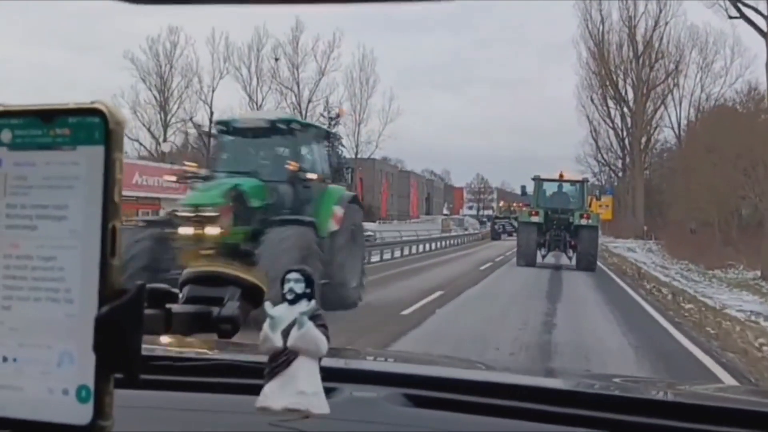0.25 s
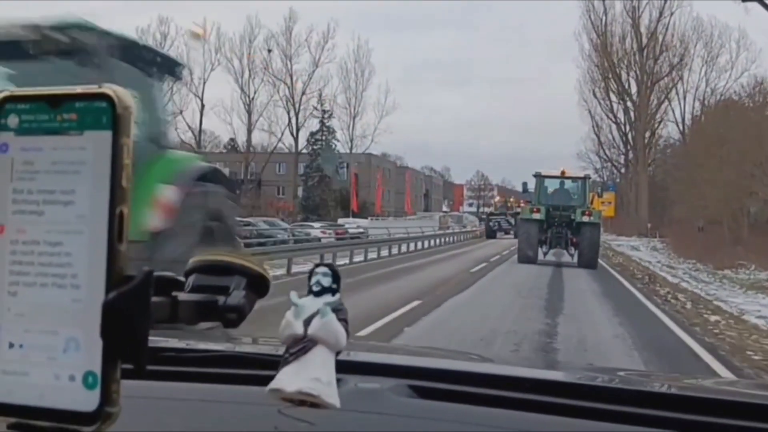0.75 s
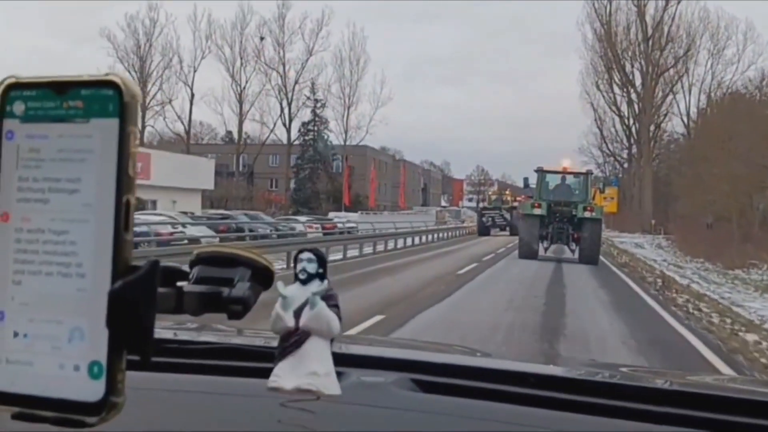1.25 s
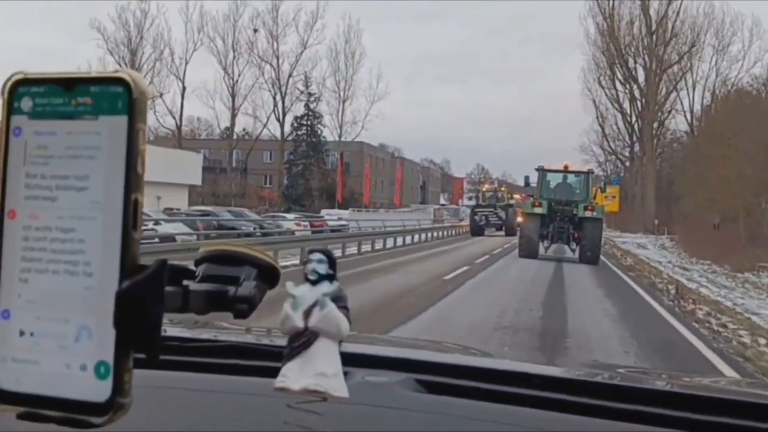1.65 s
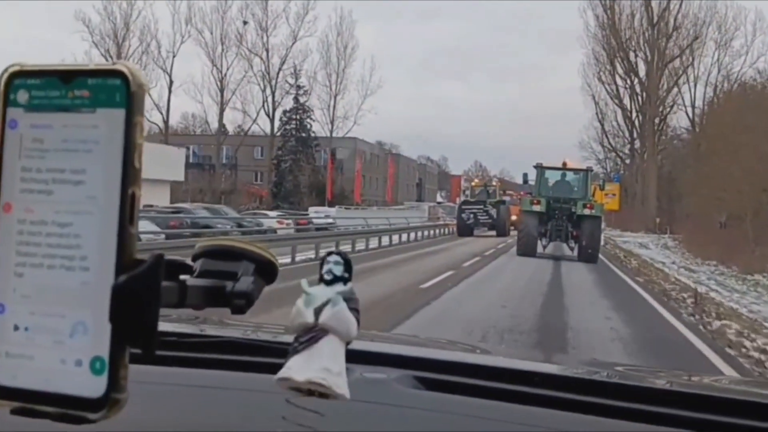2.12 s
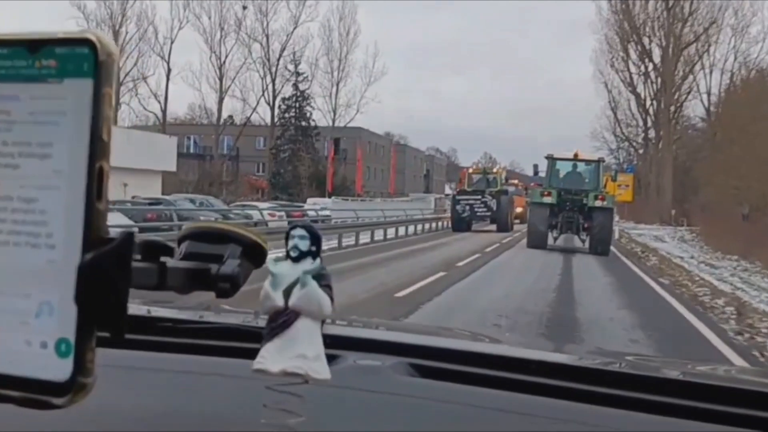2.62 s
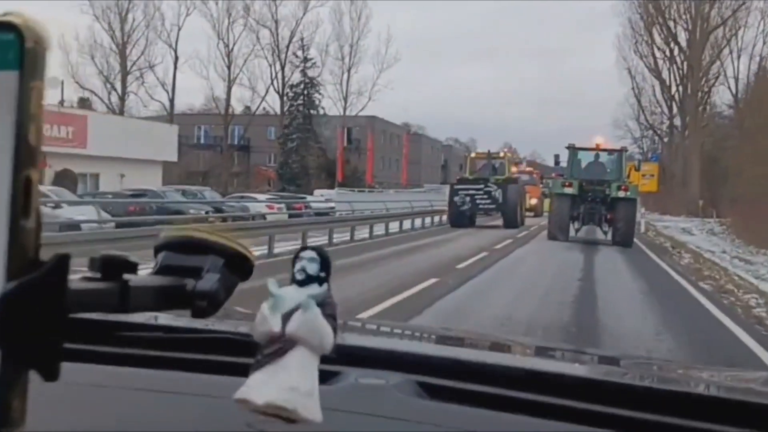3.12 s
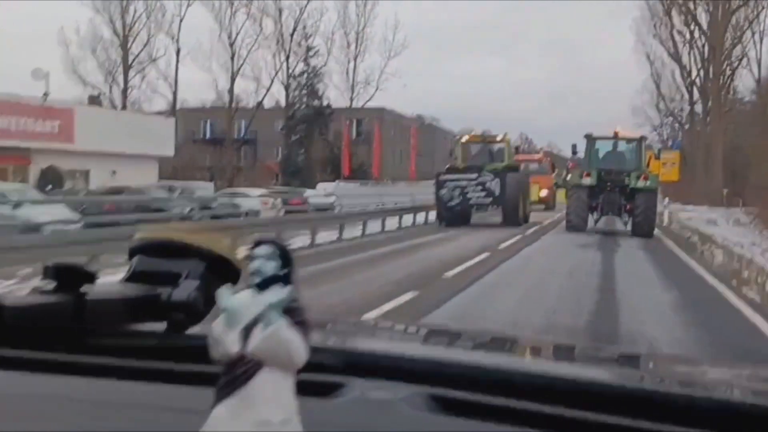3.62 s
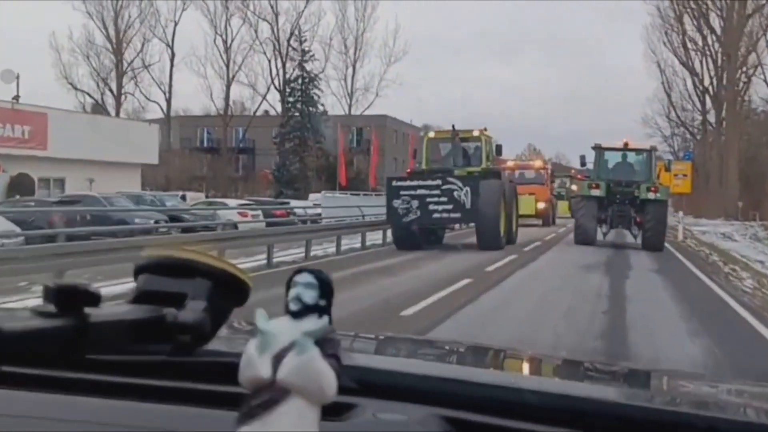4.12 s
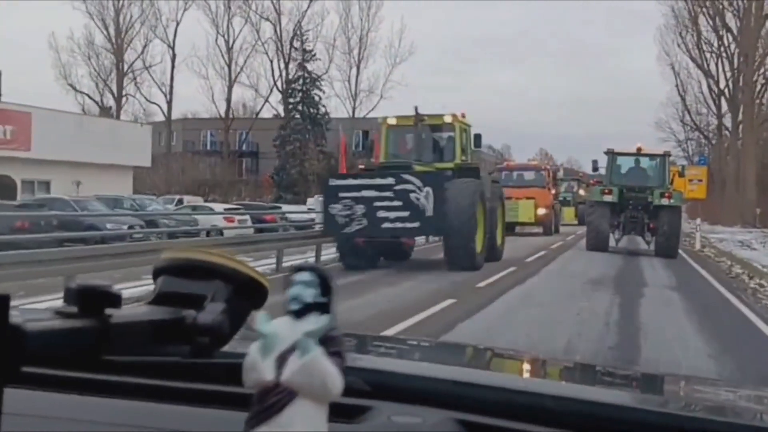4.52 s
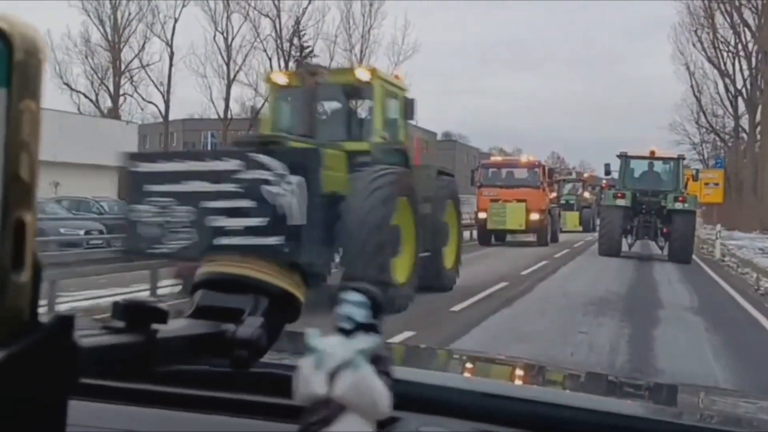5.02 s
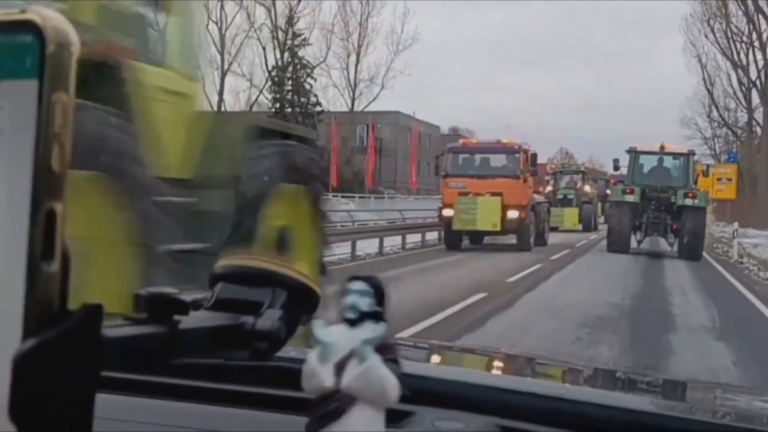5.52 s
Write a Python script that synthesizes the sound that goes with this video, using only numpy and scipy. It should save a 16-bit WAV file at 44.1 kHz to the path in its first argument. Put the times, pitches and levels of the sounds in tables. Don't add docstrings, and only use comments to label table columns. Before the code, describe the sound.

Low, bassy cabin sound: idling engine throb, wavering tyre drone and bumps. Lumpy diesel growl from a passing tractor opens it, then a single nasal horn note is held, its bright overtones swelling and dulling as the phone moves. The horn cuts off with a short echo and tiny squeaks, leaving rumble, until a last tractor growls close with brief turbo chirps. Phone microphone inside the car, on a wet road outdoors.

```python
import sys
import numpy as np
from scipy import signal
from scipy.fft import rfft, irfft, next_fast_len
from scipy.io import wavfile

SR = 44100
rng = np.random.default_rng(int(sys.argv[2]) if len(sys.argv) > 2 else 0)


def makeup_ratio(level_db):
    decades = np.asarray(level_db, float) / 20
    return 10 ** decades


def materialize(psi):
    bounded = np.clip(np.atleast_2d(psi).T, -1, 1)
    quanta = np.round(bounded * 32767).astype(np.int16)
    wavfile.write(sys.argv[1], SR, quanta)


N = 253575
STEP = 16
HORN_ON_S, HORN_OFF_S = 0.558, 3.71

# middle_s, half_length_s, level_db
BUMPS = [(1.613, 0.086, 8.5), (2.093, 0.14, 5.5), (2.477, 0.13, 3), (2.929, 0.12, 9), (3.325, 0.091, 4.5),
         (3.71, 0.15, 7.5), (4.147, 0.075, 10), (4.385, 0.034, -8.5), (4.735, 0.42, 7.5), (5.3, 0.23, 0.5),
         (5.459, 0.077, 7.5)]
# time_s, level_db
FACING = [
    (.75, 0.5),
    (1.25, -3.5),
    (1.48, -22.5),
    (1.75, 2),
    (2.1, 8),
    (2.5, -13.5),
    (2.9, 2),
    (3.35, -3.5),
    (3.68, 5.5),
]


def clock():
    return np.arange(0, N, STEP) / SR


def rms_one(x):
    return x / np.sqrt(np.mean(np.abs(x) ** 2) + 1e-20)


def in_time(rows, step=1):
    s, *columns = np.transpose(rows)
    return [np.interp(np.arange(0, N, step) / SR, s, c) for c in columns]


def at_log(points, where):
    points = np.array(points)
    return np.interp(np.log(where), np.log(points[:, 0]), points[:, 1])


def full_rate(slow):
    step = np.diff(slow, append=slow[..., -1:])
    fine = slow[..., None] + step[..., None] * (np.arange(STEP) / STEP)
    return fine.reshape(*slow.shape[:-1], -1)[..., :N]


def drift(rate_hz, size=1):
    r = np.exp(-2 * np.pi * STEP * rate_hz / SR)
    white = rng.standard_normal((size, -(-N // STEP) + 3000))
    return rms_one(signal.lfilter([1], [1, -2 * r, r * r], white)[:, 3000:])


def swells(rows):
    return sum(db * np.exp(-((clock() - s) / half) ** 2) for s, half, db in rows)


def sides(pan_db):
    return makeup_ratio(np.array([pan_db / 2, -pan_db / 2]))


def resonate(x, hz, width_hz):
    r = np.exp(-np.pi * width_hz / SR)
    top = [(1 - r * r) / 2, 0, (r * r - 1) / 2]
    return signal.lfilter(top, [1, -2 * r * np.cos(2 * np.pi * hz / SR), r * r], x)


def resonate_twice(x, hz, width_hz):
    return resonate(resonate(x, hz, width_hz), hz, width_hz)


def pair(mid, side, hz):
    # pitch_hz, likeness (0 to 1)
    likeness = [(40, 0.93), (130, 1), (200, 0.92), (330, 0.67), (550, 0.39), (1000, 0.13), (4000, 0.066),
                (9000, 0.23)]
    # pitch_hz, left_minus_right_db
    balance = [(60, -1.5), (110, 0), (190, 4), (340, 1.5), (610, -3.5), (1090, 0), (1940, 7.5), (3460, 1),
               (6170, 8), (11000, 1.5)]
    alike = np.clip(at_log(likeness, hz), 0, 1)
    both = np.sqrt(1 + alike) * mid + np.sqrt(1 - alike) * side * [[1], [-1]]
    return both * sides(at_log(balance, hz))[:, None]


def banded_noise(spectrum, patchy_db, patch_rate, moving_db):
    out, weight = 0, 0
    lowest, highest = spectrum[0][0], spectrum[-1][0]
    edges = lowest * 2 ** np.arange(0, np.log2(highest / lowest), 1 / 3)
    white, together = rng.standard_normal((2, 2, N)), drift(19.0)[0]
    for k, (low, high) in enumerate(zip(edges, edges[1:])):
        hz = np.sqrt(low * high)
        level_db = at_log(spectrum, hz)
        band_pass = signal.butter(2, [low, high], "band", fs=SR, output="sos")
        band = signal.sosfilt(band_pass, white[k % 2])
        flicker_db = patchy_db * min(1, np.sqrt(1500 / hz)) * (together / 5 + drift(patch_rate)[0])
        out = out + full_rate(makeup_ratio(level_db + flicker_db + moving_db(hz))) * pair(*band, hz)
        weight += makeup_ratio(level_db) ** 2 * (high - low) * 2 / SR
    return out / np.sqrt(weight)


def street_tail(t60_s):
    rise_s, late_s, gone_s = 0.17, 0.0072, 3.99
    s = clock()
    rising = np.clip((s - HORN_ON_S) / rise_s, 0, 1)
    dying = makeup_ratio(-60 * np.maximum(s - HORN_OFF_S - late_s, 0) / t60_s)
    return rising * dying * np.clip((gone_s - s) / 0.018, 0, 1)


def engines():
    # time_s, firing_hz
    speed = [
        (0, 35.88),
        (.85, 37.99),
        (3.57, 38.09),
        (4.69, 39.56),
        (5.75, 39.61),
    ]
    hz, = in_time(speed)
    s = np.arange(N) / SR
    turn = 2 * np.pi * np.cumsum(hz) / SR
    waver = full_rate(makeup_ratio(2.0 * drift(4.6, size=3)))
    firing = makeup_ratio(-21.5 + 2 * (hz - 38)) * waver[0] * np.sin(turn)
    double = makeup_ratio(-31) * waver[1] * np.sin(2 * turn + 1.13)

    beat_hz, beat_start, early_beats, catch_up_s = 4.85, .45, 1.77, .5
    beats = beat_hz * s + beat_start - early_beats * np.exp(-s / catch_up_s)
    leaves_s, fade_db_per_s = 1.6, 15
    neighbour_level = makeup_ratio(-28 - fade_db_per_s * np.maximum(s - leaves_s, 0))
    neighbour = neighbour_level * np.sin(turn + 2 * np.pi * beats)

    hum_hz = full_rate(61.4 + 1.5 * drift(1.5)[0])
    hum_level = full_rate(makeup_ratio(-40 + swells([(5.0, 0.64, 7.5)]))) * waver[2]
    hum = hum_level * np.sin(2 * np.pi * np.cumsum(hum_hz) / SR)
    return np.sqrt(2) * (firing + double + neighbour + hum)


def road():
    # pitch_hz, level_db (per Hz)
    rumble = [(13, -38), (22, -12), (48, -7.5), (65, -9), (86, -7), (98, -24.5), (116, -10), (134, -12),
              (160, -24), (185, -14), (199, -30), (226, -24), (339, -19.5), (376, -35), (700, -57),
              (910, -87), (1540, -120)]
    # pitch_hz, width_hz, level_db
    booms = [
        [(131.9, 16.9, 2), (115.8, 11, -9.5)],
        [(158.9, 13.3, -1), (175.8, 12.1, -4.5)],
    ]
    boom_db, boom_db_per_s = (-36, -29), (0.5, -0.6)
    s = clock()
    out = banded_noise(rumble, patchy_db=0.5, patch_rate=3.8, moving_db=lambda hz: -31.0)
    for modes, level_db, slope, kick_db in zip(booms, boom_db, boom_db_per_s, (swells(BUMPS), 0)):
        white = rng.standard_normal((2, N))
        rung = sum(makeup_ratio(db) * resonate_twice(white, hz, width) for hz, width, db in modes)
        level = full_rate(makeup_ratio(level_db + slope * s + kick_db))
        out += level * rms_one(pair(*rung, modes[0][0]))
    return out


def passing_roar():
    # pitch_hz, level_db (per Hz)
    colour = [(240, -15.5), (400, 3.5), (480, -6.5), (645, -9.5), (770, -20), (929, -4), (1130, -15),
              (1260, -14), (1540, -26.5), (1700, -20.5), (1900, -15.5), (3110, -28.5), (3730, -23.5),
              (4290, -27.5), (7840, -29.5), (11500, -43.5), (14900, -47), (22000, -120)]
    # abreast_s, gap_m, closing_speed_m_per_s, abreast_level_db
    passes = [
        (0.701, 5.6, 2.9, -58.5),
        (5.701, 4.4, 10, -57),
    ]
    # middle_s, half_length_s, level_db
    roar_swells = [
        (1.3, 0.64, 4),
        (2.1, 0.29, -5),
        (4.5, 0.5, -1),
    ]
    s, (facing_db,) = clock(), in_time(FACING, step=STEP)
    power = makeup_ratio(-77.5) ** 2
    for at, gap, speed, db in passes:
        power = power + makeup_ratio(db) ** 2 / (1 + (speed * (s - at) / gap) ** 2)
    power = power * makeup_ratio(swells(roar_swells)) ** 2
    wash = makeup_ratio(-73 + 0.27 * facing_db) * street_tail(1.2)
    roar_db = 10 * np.log10(power)
    hiss_db = 10 * np.log10(power / makeup_ratio(15.5) ** 2 + wash ** 2)

    def blend(hz):
        far = np.clip(np.log2(hz / 900) / 0.9, 0, 1)
        return (1 - far) * (roar_db + 6.5) + far * (hiss_db + 15.5)

    return banded_noise(colour, patchy_db=5.5, patch_rate=15.9, moving_db=blend)


def drone():
    s = clock()
    hz = 144.6 - 2.6 * s + 2.615 * drift(2.95)[0]
    level = makeup_ratio(-42.5 + 1.95 * s + swells(BUMPS) + 2.8 * drift(13.0)[0])
    tone = np.sqrt(2) * full_rate(level) * np.sin(2 * np.pi * np.cumsum(full_rate(hz)) / SR)
    return tone * sides(1.5)[:, None]


def whines():
    # pitch_hz, width_hz, level_db
    gears = [(935, 140, -61.5), (522, 180, -65.5), (1693, 62, -82), (3670, 320, -80), (3330, 200, -85.5)]
    out = 0
    for hz, width, db in gears:
        rung = resonate_twice(rng.standard_normal((2, N)), hz, width)
        out = out + rms_one(pair(*rung, hz)) * full_rate(makeup_ratio(db + 7.7 * drift(7.9)[0]))
    return out


def growl(body, level):
    firing_hz, knock_s = 49.85, 0.0069
    cylinder_db = [-0.5, -2.5, -2.5, -4.5]
    start, end = int(level[0][0] * SR), min(int(level[-1][0] * SR) + STEP, N)
    turns = firing_hz * np.arange(end - start) / SR
    strength = makeup_ratio(np.array(cylinder_db))[turns.astype(int) % len(cylinder_db)]
    knocks = strength * (np.exp(-(turns % 1) / firing_hz / knock_s) + .3)
    out = np.zeros((2, N))
    for hz, width, db in body:
        rung = resonate_twice(knocks * rng.standard_normal((2, end - start)), hz, width)
        lumps = full_rate(makeup_ratio(db + 2.5 * drift(31.0)[0]))[start:end]
        out[:, start:end] += rms_one(pair(*rung, hz)) * lumps
    return out * makeup_ratio(in_time(level)[0])


def first_tractor():
    # pitch_hz, width_hz, level_db
    first_body = [(1014, 240, -1), (1494, 120, -11), (1876, 54, -14), (2224, 79, -14.5)]
    # time_s, level_db
    first_level = [
        (0, -48),
        (.1, -62),
        (.22, -52.5),
        (.31, -69),
        (.38, -53),
        (.5, -68.5),
        (.9, -57.5),
        (1.4, -80),
    ]
    return growl(first_body, first_level)


def squeaks(rows):
    s, out = np.arange(N) / SR, np.zeros(N)
    for at, half, hz, db in rows:
        span = slice(max(int((at - 2 * half) * SR), 0), int((at + 2 * half) * SR))
        grain = full_rate(1 + 2.0 * drift(0.014 * hz)[0])[span]
        bell = np.exp(-((s[span] - at) / half) ** 2)
        out[span] += makeup_ratio(db) * grain * bell * np.sin(2 * np.pi * hz * s[span])
    return out * sides(7)[:, None]


def scattered_squeaks():
    # middle_s, half_length_s, pitch_hz, level_db
    whistles = [(0.04, 0.045, 3430, -67), (0.18, 0.02, 3340, -71), (0.26, 0.036, 2120, -64),
                (0.38, .03, 5850, -82), (3.79, 0.015, 945, -54), (3.91, .05, 1560, -66),
                (3.83, 0.02, 3180, -72), (4.885, .02, 950, -57), (3.89, 0.018, 945, -54),
                (4.04, 0.015, 3320, -73), (0.122, 0.018, 3350, -72), (3.9, 0.11, 330, -57),
                (5.6, 0.04, 1400, -61), (0.97, 0.14, 5950, -62), (.38, .03, 1200, -61)]
    return squeaks(whistles)


def moans():
    # middle_s, level_db
    wheel_turns = [
        (0.352, -30),
        (.8, -37.5),
        (1.25, -35.5),
        (1.681, -33.5),
        (2.1, -29),
        (2.52, -33.5),
        (2.969, -31),
        (3.42, -31),
        (3.85, -34),
        (4.25, -42.5),
    ]
    middle_hz, rise_hz_per_s, half_s = 154.37, 97, 0.17
    s, slow = clock(), 0
    waver = makeup_ratio(1.4 * drift(5.3)[0])
    for at, db in wheel_turns:
        t = s - at
        sweep = np.sin(2 * np.pi * (middle_hz + rise_hz_per_s / 2 * t) * t)
        slow = slow + makeup_ratio(db) * np.exp(-(t / half_s) ** 2) * sweep
    return np.sqrt(2) * full_rate(slow * waver) * sides(2.0)[:, None]


def windscreen_db(k):
    return in_time(FACING, step=STEP)[0] * np.clip((k - 5.1) / (9 - 5.1), 0, 1)


def direct_horn(k):
    # overtone_number, left_db, right_db, left_lead_rad (mid-blast), lead_drift_rad_per_s
    ports = [(1, -45.0, -45.0, -1.2, -0.1), (2, -47, -45.5, -0.12, -0.08), (3, -42, -49.5, -0.1, 0.63),
             (4, -50, -56.5, -0.34, -0.44), (5, -48.5, -62.5, -1.5, 0.5), (6, -64, -62, 0.8, 2.5),
             (7, -58, -59, 1.05, 1.26), (8, -61.5, -62, -2.5, -0.15), (9, -61, -66, 1.5, -0.0),
             (10, -60, -70, 2.5, 0.4), (11, -60, -62, -0.4, 2.3), (12, -65.5, -64.5, -3.0, -5.5),
             (13, -60.5, -57, -2, -1.5), (14, -63, -67.5, -2, -3.5), (15, -62, -70, -0.66, 0.5),
             (16, -65.5, -70, 2.5, 0.5), (17, -65, -71, -2, 2.5), (18, -70, -75.5, 4.5, 6),
             (19, -71, -82, -4.5, 0), (20, -75.5, -77, 0.3, -1.5), (21, -82, -83, 4, 6),
             (22, -78.5, -89.5, 3.5, 8), (23, -75.5, -86, 6.5, -1.5), (24, -67, -88, 0.5, -1),
             (25, -63, -86, -1, 2.5), (26, -64, -85.5, 1, 0.5), (27, -75, -84, -3.8, 0),
             (28, -73.5, -83.5, 1, -1), (29, -82.5, -82, 1.5, -2.5), (30, -79, -89, 6.5, -4.5),
             (31, -87.5, -79, -4, 4), (32, -85, -76.5, -5.5, 2.5), (33, -89.5, -88, -4, 0)]
    # middle_s, half_length_s, overtone_number, left_db, right_db
    crests = [(1.28, 0.4, 2.0, -8.0, -6.0), (1.64, 0.08, 2.0, -11.0, -1.0), (1.92, 0.12, 2.0, 6.0, 6.0),
              (2.68, 0.27, 2.0, 4.0, 2.0), (0.92, 0.12, 3.0, -5.0, 6.0), (1.28, 0.12, 3.0, 7.0, 0.0),
              (2.5, 0.42, 3.0, 7.0, -12.0), (3.44, 0.27, 3.0, -14.0, 9.0),
              (0.72, 0.18, 4.0, -3.0, 11.0), (2.36, 0.18, 4.0, -14.0, -10.0),
              (2.88, 0.12, 4.0, 1.0, -10.0), (3.16, 0.27, 4.0, 8.0, 2.0), (0.6, 0.08, 5.0, 1.0, -18.0),
              (3.2, 0.27, 5.0, -11.0, 0.0), (1.04, 0.08, 6.0, -6.0, -19.0),
              (1.32, 0.27, 6.0, -13.0, 7.0), (2.12, 0.4, 6.0, 8.0, 5.0), (2.32, 0.05, 6.0, -3.0, -16.0),
              (2.88, 0.08, 6.0, -18.0, 0.0), (3.56, 0.4, 6.0, -3.0, -16.0),
              (1.2, 0.18, 7.0, -2.0, -18.0), (1.76, 0.08, 7.0, 2.0, -12.0),
              (2.48, 0.27, 7.0, 10.0, 15.0), (3.16, 0.08, 7.0, -1.0, -15.0),
              (3.28, 0.18, 7.0, -24.0, -5.0), (1.24, 0.27, 8.0, -2.0, -11.0),
              (1.88, 0.27, 8.0, 4.0, 7.0), (2.56, 0.08, 8.0, -12.0, -10.0),
              (2.92, 0.12, 8.0, -15.0, -4.0), (3.28, 0.27, 8.0, -2.0, 9.0),
              (1.52, 0.08, 9.0, -2.0, 12.0), (2.12, 0.18, 9.0, 8.0, 3.0),
              (2.64, 0.12, 9.0, -21.0, -5.0), (2.84, 0.08, 9.0, -10.0, 8.0),
              (3.12, 0.18, 9.0, 8.0, 9.0), (3.52, 0.12, 9.0, -13.0, -14.0),
              (0.6, 0.12, 10.0, -6.0, -18.0), (1.48, 0.4, 10.0, 6.0, 12.0),
              (2.16, 0.27, 10.0, -16.0, -2.0),
              (2.8, 0.12, 10.0, 3.0, 18.0), (3.16, 0.12, 10.0, 16.0, 7.0),
                     (0.76, 0.12, 11.0, 9.0, 9.0), (2.0, 0.27, 11.0, 5.0, 11.0),
                     (2.68, 0.27, 11.0, -8.0, -8.0), (3.56, 0.12, 11.0, 13.0, 4.0),
                     (1.08, 0.12, 12.0, -13.0, -10.0), (1.44, 0.12, 12.0, 9.0, -5.0),
                     (2.12, 0.27, 12.0, -12.0, -5.0), (2.76, 0.08, 12.0, 7.0, 8.0),
                     (3.36, 0.4, 12.0, 6.0, 10.0), (0.88, 0.4, 13.0, 4.0, -4.0),
                     (1.64, 0.12, 13.0, 5.0, 7.0), (2.64, 0.08, 13.0, -3.0, -17.0),
                     (2.8, 0.12, 13.0, -12.0, 6.0), (3.52, 0.05, 13.0, -10.0, -18.0),
                     (0.6, 0.08, 14.0, -11.0, -27.0), (0.8, 0.12, 14.0, 9.0, 1.0),
                     (1.04, 0.05, 14.0, 0.0, -26.0), (1.36, 0.08, 14.0, -13.0, -9.0),
                     (1.92, 0.27, 14.0, 9.0, 9.0), (2.48, 0.27, 14.0, -6.0, -10.0),
                     (2.8, 0.08, 14.0, 11.0, -5.0), (3.12, 0.12, 14.0, -5.0, 15.0),
                     (3.64, 0.12, 14.0, 10.0, 12.0), (0.96, 0.4, 15.0, 12.0, 9.0),
                     (1.84, 0.08, 15.0, 10.0, 6.0), (2.12, 0.12, 15.0, 7.0, 16.0),
                     (2.4, 0.08, 15.0, -17.0, -17.0), (2.6, 0.05, 15.0, -20.0, -4.0),
                     (3.08, 0.12, 15.0, -15.0, 0.0), (3.6, 0.12, 15.0, -16.0, -9.0),
                     (1.08, 0.08, 16.0, -8.0, -13.0), (1.96, 0.12, 16.0, 5.0, 13.0),
                     (2.56, 0.12, 16.0, -9.0, -12.0), (2.76, 0.08, 16.0, 11.0, -4.0),
                     (3.16, 0.27, 16.0, -5.0, 14.0), (3.68, 0.08, 16.0, 10.0, 11.0),
                     (0.64, 0.08, 17.0, 5.0, -16.0),
              (0.88, 0.18, 17.0, 13.0, 14.0), (1.24, 0.12, 17.0, -20.0, 6.0),
                    (1.8, 0.18, 17.0, -2.0, -12.0), (2.4, 0.18, 17.0, -17.0, -12.0),
                    (3.08, 0.12, 17.0, 16.0, 18.0), (3.4, 0.08, 17.0, -20.0, -3.0),
                    (3.64, 0.18, 17.0, -1.0, 21.0), (0.84, 0.18, 18.0, 0.0, 9.0),
                    (1.28, 0.12, 18.0, 13.0, 14.0), (1.88, 0.08, 18.0, 9.0, 11.0),
                    (2.52, 0.4, 18.0, -6.0, -6.0), (3.04, 0.08, 18.0, 12.0, 24.0),
                    (3.68, 0.18, 18.0, 18.0, -6.0), (1.0, 0.2, 19.0, 12.0, 8.0),
                    (2.04, 0.08, 19.0, 9.0, 12.0), (2.72, 0.4, 19.0, -6.0, -5.0),
                    (1.08, 0.27, 20.0, 12.0, 2.0), (2.0, 0.18, 20.0, 9.0, 11.0),
                    (3.04, 0.05, 20.0, 14.0, 6.0), (1.96, 0.18, 21.0, 10.0, -3.0),
                    (2.0, 0.12, 22.0, 12.0, -6.0), (2.04, 0.12, 23.0, -13.0, -6.0),
                    (2.32, 0.08, 23.0, 14.0, 2.0), (3.04, 0.4, 23.0, 9.0, 0.0),
                    (2.08, 0.08, 24.0, -23.0, -6.0), (3.64, 0.12, 24.0, 13.0, 11.0),
                    (0.6, 0.4, 25.0, 5.0, 7.0), (2.12, 0.05, 25.0, -17.0, -8.0),
                    (2.36, 0.12, 25.0, 10.0, 9.0), (2.28, 0.05, 26.0, 14.0, 4.0),
                    (2.04, 0.08, 28.0, -15.0, -6.0), (2.32, 0.08, 28.0, 10.0, 21.0),
                    (1.4, 0.27, 29.0, 5.0, 8.0), (1.84, 0.08, 29.0, 16.0, 12.0),
                    (2.28, 0.05, 29.0, 15.0, 13.0), (1.8, 0.08, 30.0, 16.0, -3.0),
                    (2.28, 0.08, 30.0, 18.0, 16.0), (3.36, 0.12, 31.0, -1.0, 18.0),
                    (3.2, 0.08, 32.0, 0.0, 17.0),
              (.85, .15, 11, 4, 4),
        (1.0, .1, 4, -5, -5),
        (2.38, .08, 4, -6, -6),
        (2.2, .12, 15, 5, 5),
        (1.25, .08, 15, 5, 5),
        (2.4, .12, 13, 5, 5),
    ]
    rise_s, fall_s, mid_blast_s = 0.011, .014, 2.15
    bloom_s = .08 if 5 < k < 22 else rise_s
    s = clock()
    since_on = s - HORN_ON_S
    held = np.clip(since_on / rise_s, 0, 1) * np.clip(1 - (s - HORN_OFF_S) / fall_s, 0, 1)
    held = held * np.clip(since_on / bloom_s, 0, 1)

    near = [(at, half, np.array([[left_db], [right_db]]))
            for at, half, n, left_db, right_db in crests
            if round(n) == k]
    slow_fade_db = 1.2 * np.sqrt(min(k, 9) / 9) * drift(2.5, size=2)
    flutter_db = 2.2 * min(k, 14) / 14 * drift(27.0)[0]
    fading = makeup_ratio(swells(near) + slow_fade_db + flutter_db)

    _, *level_db, lead, turning = ports[k - 1]
    level = makeup_ratio(np.c_[level_db] + .5 * windscreen_db(k))
    left_lead = (lead + turning * (s - mid_blast_s)) * np.c_[[1, 0]]
    return held * level * fading * np.exp(2j * np.pi * rng.random() + 1j * left_lead)


def street_echo(k):
    # overtone_number, echo_db, left_minus_right_db
    echo_trend = [(2.03, -55, 1), (3.07, -56, 5.5), (4.02, -54, 0), (5.06, -55.5, 4), (7.3, -58.5, 6),
                  (10.6, -61.5, 6), (15.7, -71.5, 6), (26.5, -83.5, 26)]
    # overtone_number, level_db (against the trend)
    trumpet = [(1, -7), (2, 2.5), (5, -2), (6, -9.5), (7, -3), (8, -5), (9, -6.5), (11, -1.5), (13, 1),
               (17, 1), (19, -9.5), (22, -33), (24, 0.5), (27, 1.5), (29, -22), (32, -24.5), (36, -43)]
    s = clock()
    rise_hz = 10.0 - 1.9 * np.maximum(s - 1.6, 0)
    rise = 2 * np.pi * np.cumsum(rise_hz) * STEP / SR

    a = drift(.9 * k, size=4)
    head_on = (a[:2] + 1j * a[2:]) * np.exp(1j * k * rise) * np.clip((3.81 - s) / .015, 0, 1)
    b = drift(2.4 * k, size=4)
    oblique = (b[:2] + 1j * b[2:]) * np.exp(.6j * k * rise) * makeup_ratio(-2.5)

    number, *trend = np.transpose(echo_trend)
    echo_db, pan_db = (np.interp(np.log(k), np.log(number), c) for c in trend)
    t60_s = 0.8 * min(1, (5 / k) ** 1.9 + .3)
    sway_db = 3.5 * drift(9.6)[0]
    level = street_tail(t60_s) * makeup_ratio(echo_db + at_log(trumpet, k) + 0.17 * windscreen_db(k) + sway_db)
    return level * sides(pan_db)[:, None] * (head_on + oblique)


def horn():
    # time_s, pitch_hz
    diaphragm = [
        (.555, 315),
        (.585, 306.5),
        (.62, 305.9),
        (1.45, 305.8),
        (1.6, 306.2),
        (3.7, 306.45),
    ]
    cycle = np.exp(2j * np.pi * np.cumsum(in_time(diaphragm)[0]) / SR)
    carrier, out = cycle, np.zeros((2, N))
    for k in range(2, 34):
        carrier = carrier * cycle
        envelope = np.sqrt(2) * direct_horn(k) + street_echo(k)
        out += full_rate(envelope.real) * carrier.real - full_rate(envelope.imag) * carrier.imag
    out[0] = np.roll(out[0], 25)
    return out


def air():
    on_s, rise_s, off_s, fall_s = 2.58, 0.27, 3.777, 0.34
    tick_s = 3.513
    white = rng.standard_normal((2, N))
    patchy = full_rate(makeup_ratio(3.5 * drift(22.0, size=3)))
    low = patchy[0] * resonate_twice(white, 7700, 1100)
    middle = patchy[1] * resonate_twice(white, 8400, 400)
    high = makeup_ratio(-7.0) * patchy[2] * resonate_twice(white, 9800, 1200)
    hiss = rms_one(low + middle + high) * makeup_ratio(np.array([[3.0], [-8.0]]))
    top = signal.sosfilt(signal.butter(2, 11500, "high", fs=SR, output="sos"), white)
    s = np.arange(N) / SR
    shape = np.clip(np.minimum((s - on_s) / rise_s, 1 - (s - off_s) / fall_s), -.1, 1)
    tick = makeup_ratio(-50) * (s > tick_s) * np.exp(-np.clip(s - tick_s, 0, 1) / 0.0095)
    level = makeup_ratio(-64.5 + 10.5 + 17.5 * (shape - 1)) + tick
    return level * (hiss + makeup_ratio(-15) * top)


def last_tractor():
    # pitch_hz, width_hz, level_db
    last_body = [(890, 210, 0), (1290, 150, -8.5), (1753, 99, -7.5), (2365, 140, -14.5), (3620, 300, -22.5)]
    # time_s, level_db
    last_level = [
        (4.8, -85),
        (5.0, -76.5),
        (5.06, -53.5),
        (5.3, -63),
        (5.4, -79),
        (5.5, -57.5),
        (5.62, -50),
        (5.75, -57.5),
    ]
    return growl(last_body, last_level)


def last_chirps():
    # middle_s, half_length_s, pitch_hz, level_db
    turbo = [
        (5.125, 0.025, 3720, -65),
        (5.23, 0.013, 3870, -67),
        (5.42, 0.014, 3650, -73),
        (5.49, .015, 1250, -56),
        (5.53, 0.021, 950, -55),
        (5.365, .015, 850, -52.5),
    ]
    return squeaks(turbo)


def late_left(x):
    # time_s, delay_samples
    port_lag = [
        (0, 26.4),
        (1.5, 28),
        (2.5, 30.3),
        (4, 30),
        (5.75, 31.2),
    ]
    bass_lag, bass_top_hz = 13, 700
    x = np.interp(np.arange(N) - in_time(port_lag)[0], np.arange(N), x)
    size = next_fast_len(N + SR // 10)
    hz = np.arange(size // 2 + 1) * SR / size
    lag_s = bass_lag / SR / (1 + (hz / bass_top_hz) ** 4)
    return irfft(rfft(x, size) * np.exp(-2j * np.pi * hz * lag_s), size)[:N]


def scene():
    boom = engines()
    around = road() + passing_roar() + drone() + whines() + first_tractor() + scattered_squeaks() + moans()
    honk = horn()
    left, right = around + air() + last_tractor() + last_chirps()
    late_boom = np.interp(np.arange(N) - 38, np.arange(N), boom)
    cabin = np.array([late_boom, boom]) * sides(-.4)[:, None]
    return np.array([late_left(left), right]) + honk + cabin


def band_limit(x):
    return signal.sosfilt(signal.butter(12, 15400, fs=SR, output="sos"), x)


def record(dry):
    return band_limit(dry)


dry = scene()
out = record(dry)
materialize(out)
```